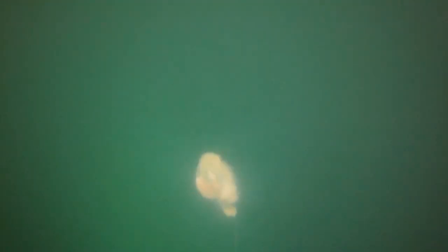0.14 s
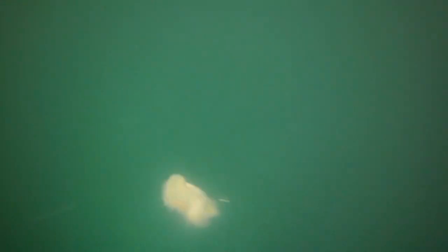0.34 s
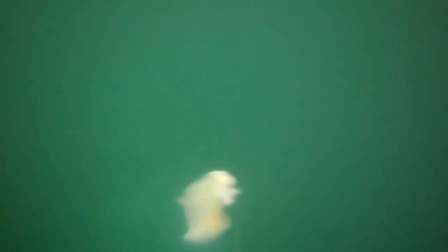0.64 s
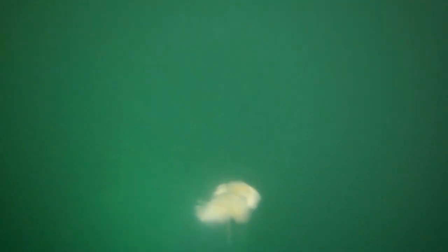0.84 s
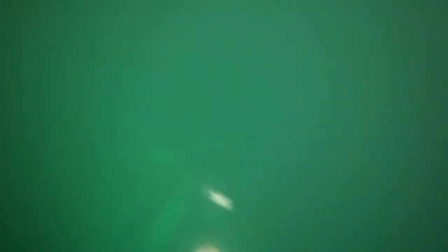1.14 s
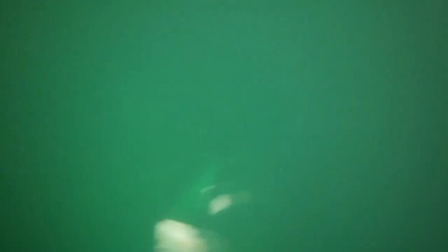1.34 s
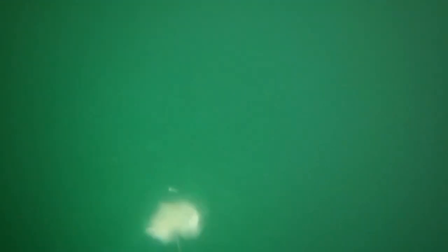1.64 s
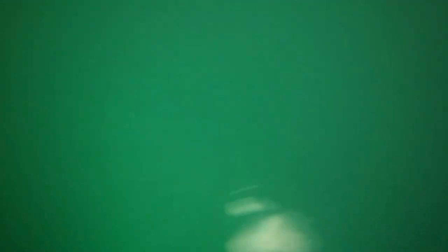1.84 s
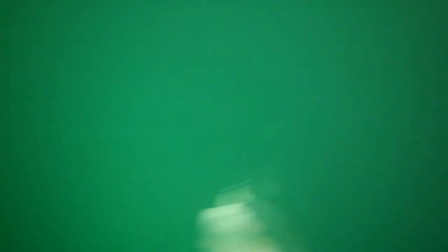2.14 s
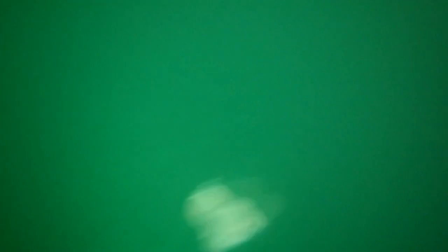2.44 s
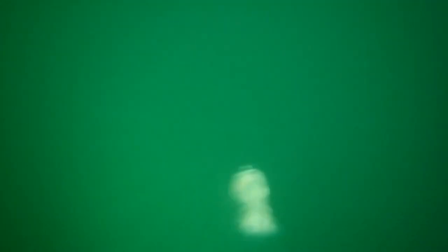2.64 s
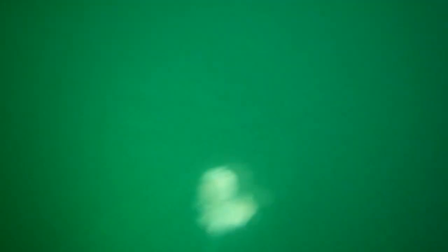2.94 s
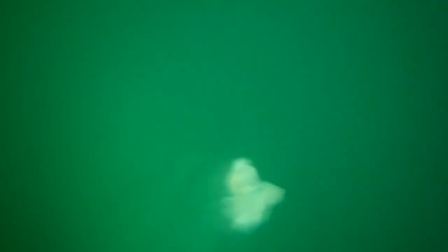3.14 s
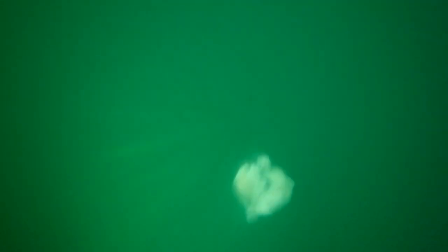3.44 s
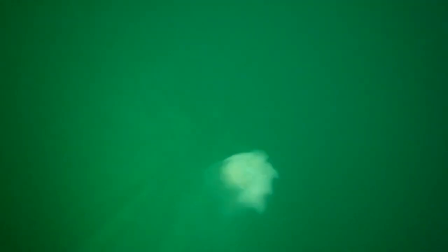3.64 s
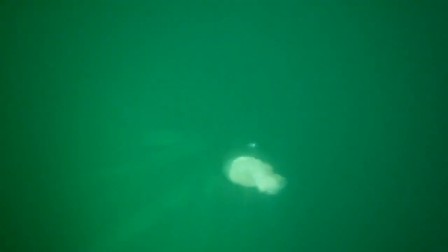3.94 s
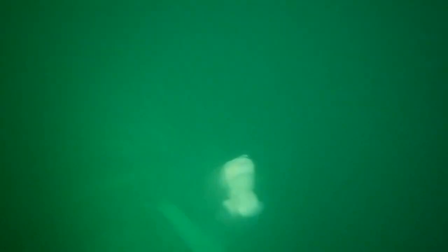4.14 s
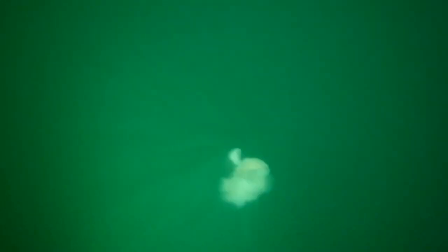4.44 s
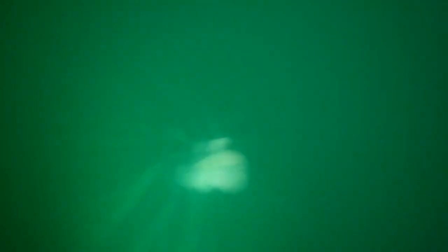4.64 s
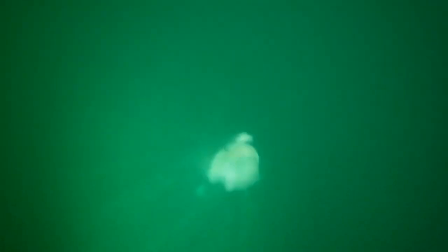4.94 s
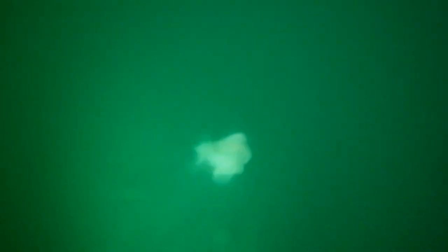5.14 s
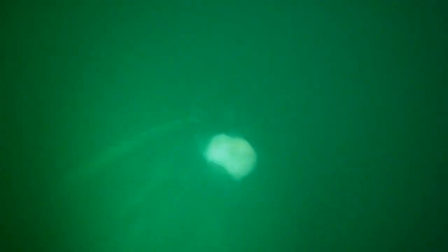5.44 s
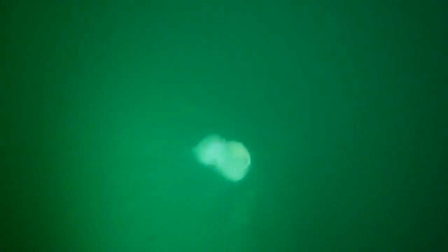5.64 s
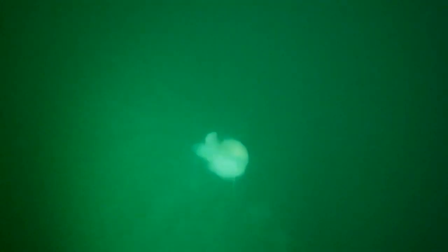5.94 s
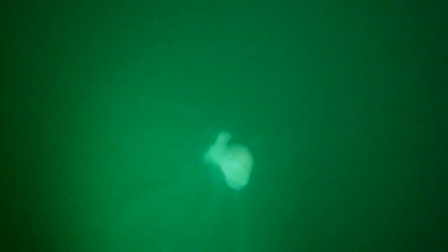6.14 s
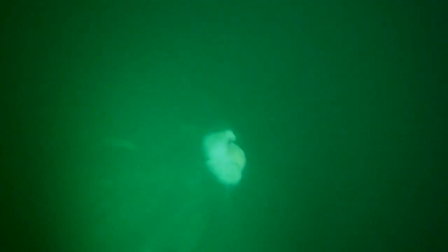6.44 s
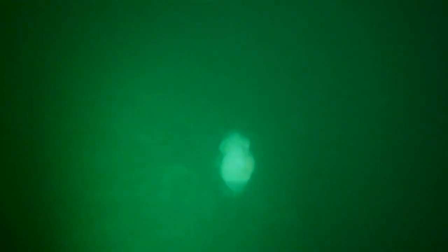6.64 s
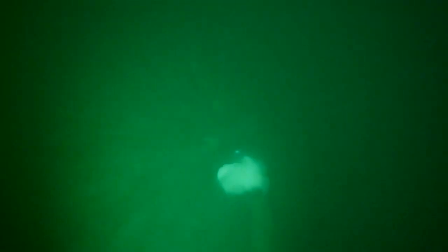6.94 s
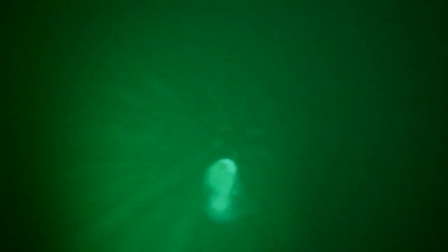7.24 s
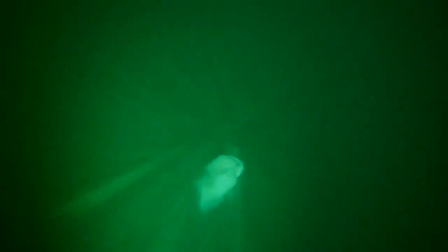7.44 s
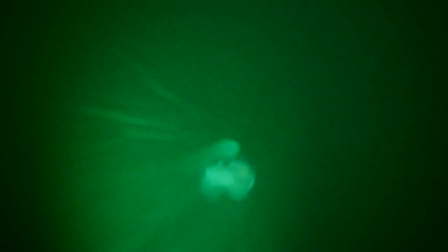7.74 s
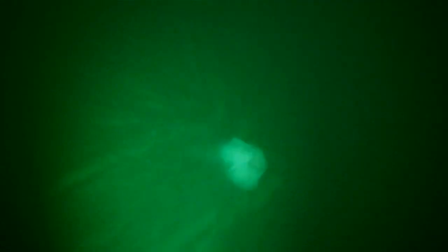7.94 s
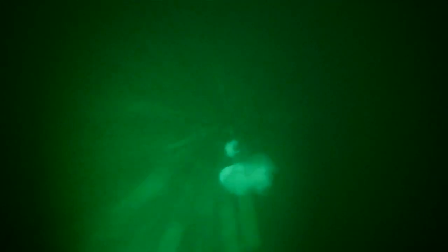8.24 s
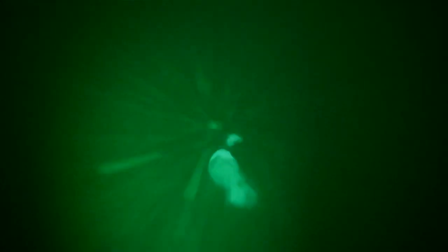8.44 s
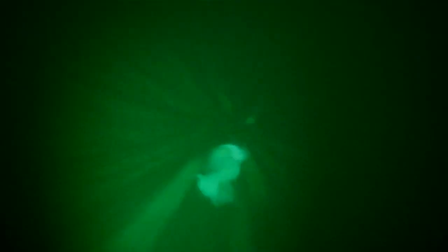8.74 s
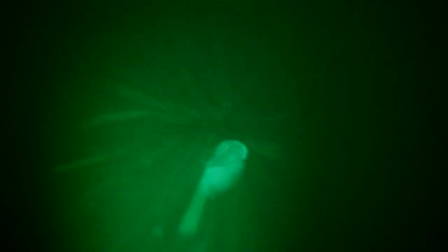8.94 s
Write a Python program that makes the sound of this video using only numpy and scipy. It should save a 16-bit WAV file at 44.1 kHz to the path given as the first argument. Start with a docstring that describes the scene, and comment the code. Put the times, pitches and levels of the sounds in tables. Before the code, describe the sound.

A hissing underwater rush surges against a plastic case, broken by clicks, knocks and brief gliding squeaks, slowly growing softer.

```python
"""Water and line rub the sealed plastic housing of a sinking camera, heard by its own microphone.
This friction forces the shell's resonances, and stick-slip motion breaks it into gliding squeals.
Jolts excite the same resonances by impact; the rush swells when the line tugs and at times dips briefly.
Underneath, the enclosed air hums, the water makes a low wash and the electronics hiss."""
import sys
import numpy as np
from scipy import signal
from scipy.fft import rfft, irfft, next_fast_len
from scipy.io import wavfile
from scipy.ndimage import uniform_filter1d

SR = 44100
rng = np.random.default_rng(int(sys.argv[2]) if len(sys.argv) > 2 else 0)


def transcribe(u):
    """Save the signal u as a 16-bit wav file named by the first command-line argument.

    u: samples, shape (n,) or (channels, n), limited to [-1, 1]; the rate is SR.
    q: integer samples, one column per channel.
    """
    v = np.clip(np.atleast_2d(u).T, -1, 1)
    q = np.round(v * 32767).astype(np.int16)
    wavfile.write(sys.argv[1], SR, q)


N = 400428


def undb(db):
    return 10 ** (np.asarray(db) / 20)


def level(x, db):
    return x * undb(db) / np.sqrt(np.mean(x ** 2))


def curve(table):
    """Linear interpolation: each column of a table against the time in its first."""
    time_s, *columns = np.transpose(table)
    return [np.interp(np.arange(N) / SR, time_s, c) for c in columns]


def walk(rate_hz):
    """Random modulation: held values, smoothed twice, with a spread near 1."""
    hold = max(int(SR / rate_hz), 2)
    steps = np.repeat(rng.standard_normal(N // hold + 1), hold)
    return 1.29 * uniform_filter1d(uniform_filter1d(steps, hold), hold)[:N]


def ring(drive, modes):
    """Modal superposition: steep resonances of alternating sign; white noise keeps its rms."""
    size = next_fast_len(N + SR // 4)
    f = np.arange(size // 2 + 1) * SR / size
    response = sum((-1) ** k * undb(db) * (1j * f * width / (hz ** 2 - f ** 2 + 1j * f * width)) ** 2
                   for k, (hz, width, db) in enumerate(modes))
    return irfft(rfft(drive, size) * response, size)[:N] / np.sqrt(np.mean(np.abs(response) ** 2))


def coloured(spectrum, rms_db):
    """Spectral shaping: white noise weighted by a curve over log frequency."""
    size = next_fast_len(N)
    f = np.maximum(np.arange(size // 2 + 1) * SR / size, 1)
    hz, density_db = np.transpose(spectrum)
    gain = undb(np.interp(np.log(f), np.log(hz), density_db))
    return level(irfft(rfft(rng.standard_normal(size)) * gain, size)[:N], rms_db)


# Rush along the housing: time_s, lower_level_db, upper_over_lower_db
RUSH = [(0, -24.5, 2), (.2, -28.5, 0.5), (.5, -27, -0.5), (1.3, -27, 1.5), (1.8, -28.5, -2.5),
        (2.3, -31, -4), (2.7, -30, -2.5), (3.3, -28.5, -1.5), (3.9, -27.5, -3), (4.1, -31.5, -7),
        (4.5, -31, -5), (5.1, -31, 0.5), (5.9, -31.5, -6), (6.6, -35, -4.5), (7.4, -35, -5.5),
        (8, -38.5, -6.5), (8.5, -37.5, -6), (9.08, -36, -6.5)]
# Tugs on the line: crest_s, half_span_s, lower_rise_db, upper_rise_db
SURGES = [(0.007, 0.046, 6, 0), (0.336, 0.09, 3, 1.5), (1.163, 0.04, 1.5, 4), (1.394, .06, 4.5, -1),
          (1.482, 0.074, 1, 6.5), (1.587, 0.061, 2, 3.5), (1.641, .04, 2, -1), (1.767, 0.046, 0.5, 5.5),
          (1.851, .06, -1, 5), (1.947, 0.043, 1, -10), (2.005, 0.069, 1, 4), (2.234, 0.06, 7, 0.5),
          (2.16, 0.032, 1, 2), (2.342, 0.065, -2, 6), (2.508, .1, 5, -0.5), (2.553, 0.052, 2, 0),
          (3.761, 0.049, 1, 6.5), (3.924, 0.059, 0.5, 3.5), (4.021, .05, 6, 14), (4.172, 0.087, 1.5, 9.5),
          (4.299, 0.053, 0, 7), (4.436, .06, 4, 8), (6.805, 0.056, -1, 2.5), (6.93, 0.051, 3, 1),
          (7.031, 0.065, 1, 2), (7.148, 0.081, 0, 1.5), (7.68, 0.11, 4, 4), (7.784, 0.043, 8, 9),
          (8.083, 0.032, 9.5, 5), (8.226, .12, 5.5, 1.5), (8.387, 0.028, 9, 0), (8.541, .14, 7.5, 3),
          (9.041, 0.083, 0, 0.5)]


def rush():
    """Friction noise swells with each tug: its envelopes in dB for the lower and upper shell modes."""
    t = np.arange(N) / SR
    lower_db, upper_over_lower_db = curve(RUSH)
    upper_db = lower_db + upper_over_lower_db
    for crest_s, half_span_s, lower_rise_db, upper_rise_db in SURGES:
        near = slice(max(int((crest_s - half_span_s) * SR), 0), int((crest_s + half_span_s) * SR))
        hump = np.cos(np.pi / 2 * (t[near] - crest_s) / half_span_s) ** 4
        lower_db[near] += lower_rise_db * hump
        upper_db[near] += upper_rise_db * hump
    return lower_db, upper_db


def bubbles(low_hz, high_hz, length_s, count):
    """Small bubbles and slips oscillate briefly: gliding tones superposed at random, at rms 1."""
    when, pitch, glide, size = rng.random((count, 4)).T[:, :, None]
    progress = np.arange(int(length_s * SR)) / (length_s * SR)
    hz = low_hz * (high_hz / low_hz) ** pitch * (1 + 0.33 * (glide - .5) * progress)
    envelope = undb(-3.5 * np.log(size + 0.061)) * np.sin(np.pi * progress) ** 2
    grains = envelope * np.sin(2 * np.pi * np.cumsum(hz, axis=1) / SR)
    place = (when * N).astype(int) + np.arange(len(progress))
    return level(np.bincount(place.ravel(), grains.ravel(), minlength=N)[:N], 0)


def grit(count=420, rise_db=9, length_s=0.006):
    """Grit on the shell modulates the friction: brief random rises of its level, in dB."""
    when, size = rng.random((count, 2)).T
    contacts = np.bincount((when * N).astype(int), size ** 2, minlength=N)
    return rise_db * signal.oaconvolve(contacts, np.hanning(int(length_s * SR)), "same")


# Lower shell modes: pitch_hz, width_hz, shallow_gain_db, deep_gain_db
LOWER_MODES = [(276, 150, -15, -61), (481.7, 129, -15, -2), (711, 340, -8, -14), (979, 250, -4, 2.5),
               (1152.5, 157, 3.5, -4), (1368, 305, -2, -4.5)]
# Upper shell modes: pitch_hz, width_hz, gain_db
UPPER_MODES = [(2320, 800, -18.5), (2761, 343, -0.5), (2898, 190, 3), (3280, 390, 7.5), (3950, 585, -4),
               (5540, 620, -23.5)]
# Thud and ring of a jolt: pitch_hz, width_hz, gain_db
KNOCK_MODES = [(186, 250, -8), (444, 340, -8.5), (1068, 124, 9)]


def housing():
    """Forced vibration: rubbing, jolts and squeal overtones drive the shell; the fundamental adds on."""
    lower_db, upper_db = rush()
    eddies_db = 1.1 * walk(18) + 1.1 * walk(55)  # felt by the whole shell
    lower_blows, upper_blows = jolts()
    fundamental, overtones = squeals()
    grit_db = grit()
    friction = rng.standard_normal(N)
    # While the line squeals, its plain rubbing gives way.
    squeal_envelope = uniform_filter1d(np.abs(fundamental), int(0.012 * SR))
    rub_gain = dips() / (1 + squeal_envelope / undb(-18.5))

    lower_rub = friction + undb(-14) * bubbles(low_hz=600, high_hz=1502.5, length_s=.022, count=1500)
    lower_gain = rub_gain * undb(lower_db - 4 + eddies_db + 0.57 * walk(30) + .7 * grit_db)
    lower_drive = lower_gain * lower_rub + lower_blows
    upper_rub = friction + undb(-13) * bubbles(low_hz=1800, high_hz=4507.5, length_s=.011, count=1800)
    upper_gain = rub_gain * undb(upper_db - 3.5 + eddies_db + 1.13 * walk(40) + grit_db)
    upper_drive = upper_gain * upper_rub + upper_blows

    depth = np.linspace(0, 1, N)  # growing pressure shifts the balance of the lower modes
    pitch_hz, width_hz, shallow_db, deep_db = np.transpose(LOWER_MODES)
    shallow = ring(lower_drive, np.c_[pitch_hz, width_hz, shallow_db])
    deep = ring(lower_drive, np.c_[pitch_hz, width_hz, deep_db])
    upper = ring(upper_drive + undb(-4 - 14.3 * depth) * overtones, UPPER_MODES)
    thud = undb(-6.5) * ring(lower_blows, KNOCK_MODES)
    return (1 - depth) * shallow + depth * deep + upper + fundamental + thud


# Hum of the enclosed air: time_s, level_db
CAVITY_HUM = [(0, -48), (.15, -44.5), (1.85, -54), (1.93, -40), (2.9, -37.5), (3.4, -44), (3.9, -39.5),
              (4.02, -43), (4.08, -58), (4.2, -42), (4.4, -44), (5.4, -46.5), (5.9, -40), (7.5, -46),
              (7.65, -45), (7.95, -49), (8.1, -40), (9.08, -42.5)]


def cavity(pitch_hz=575, sag_hz=30, width_hz=80):
    """Cavity resonance: the shaken air hums in one narrow band that wavers and sags with depth."""
    level_db, = curve(CAVITY_HUM)
    hz = (pitch_hz - np.linspace(0, sag_hz, N)) * (1 + .02 * walk(12))
    phase = 2 * np.pi * np.cumsum(hz) / SR
    hum = walk(width_hz) * np.sin(phase) + walk(width_hz) * np.cos(phase)
    return undb(level_db + 3.37 * walk(20)) * level(hum, -0.89)


# Spectrum of the wash: frequency_hz, relative_density_db
WASH_SPECTRUM = [(15, -67), (25, -34), (162, -12), (400, -4), (520, -19), (880, -120)]
# Swell of the wash: time_s, gain_db
WASH_SWELL = [(0, 8), (.5, 0.5), (1.3, -1.5), (1.4, 10), (1.5, 0), (2.5, -0.5), (3.4, 0.5), (4, -1),
              (4.7, -0.5), (5.3, 0), (6.2, 1), (7.4, -0.5), (7.7, 0), (8, 2), (9.08, -2.5)]


def wash():
    """Flow noise: a low band from the water, slowly modulated in amplitude."""
    swell_db = curve(WASH_SWELL)[0] + 3.1 * walk(9)
    return undb(swell_db) * coloured(WASH_SPECTRUM, rms_db=-52.5)


# Spectrum of the hiss: frequency_hz, relative_density_db
HISS_SPECTRUM = [(300, 2), (2000, 7), (5000, -2), (7000, -2), (10000, -1.5), (13000, -1.5), (16000, 1)]


def hiss():
    """Electronic self-noise: a broadband floor that flickers slightly."""
    flicker_db = 0.61 * walk(12) + .5 * walk(35)
    return undb(flicker_db) * coloured(HISS_SPECTRUM, rms_db=-42.5)


# Blows on the housing: time_s, relative_level_db, upper_gain_db, decay_s
JOLTS = [(0.068, -10.5, -4, 0.011), (0.644, -15, -10, 0.0091), (1.128, -22, 10, 0.0074),
         (1.212, -18.5, -14, 0.013), (1.694, -20, 0, 0.009), (1.848, -21, -7, 0.0064),
         (1.944, -11.5, -10, 0.0089), (2.092, -22, -12, 0.005), (2.144, -11, -9, 0.012),
         (2.177, -12.5, -3, 0.0061), (2.208, -14, -18, 0.0098), (2.279, -12, -4, 0.0062),
         (2.429, -18.5, 2, 0.0057), (2.545, -22, 9, 0.0095), (2.591, -19.5, 6, 0.0082),
         (3.149, -26.5, 13.5, 0.0077), (3.343, -13, -8, 0.0078), (3.588, -12.5, -6, 0.0075),
         (3.95, -7, -9, 0.0082), (4.001, -7, -16, 0.011), (4.193, -18, -2, 0.0096),
         (4.274, -10, -12, 0.0078), (4.304, -8.5, -15, 0.0032), (4.435, -16, -0.5, 0.0076),
         (4.522, -18, -1, 0.011), (4.562, -11, -8.5, 0.0069), (5.154, -14, -8, 0.0086),
         (5.361, -21, -17, 0.0092), (6.532, -18, -4, 0.011), (6.757, -17, -1.5, 0.011),
         (6.978, -15, -4.5, 0.0093), (7.273, -17, -6, 0.0092), (7.495, -16, -10, 0.011),
         (7.602, -8.5, -17, 0.0083), (7.648, -8.5, -13.5, 0.0095), (7.68, -17.5, -7, 0.011),
         (7.784, -15.5, -3, 0.015), (7.817, -15, -14, 0.007), (8.093, -18, 1, 0.0073),
         (8.238, -21, -3, 0.011), (8.528, -16, -5, 0.0074), (9.007, -16.5, -9, 0.0066)]


def jolts(scrape_db=-13.5, upper_coupling_db=2, rise_over_decay=0.54, tap_delay_s=.004):
    """Impact excitation of the lower and upper modes: a scrape swells to a sharp tap, then dies."""
    lower, upper = np.zeros(N), np.zeros(N)
    lead = SR // 50
    for time_s, level_db, upper_gain_db, decay_s in JOLTS:
        start = int((time_s + tap_delay_s) * SR) - lead
        age = np.arange(-lead, 4 * lead) / SR / decay_s
        envelope = np.exp(-np.where(age < 0, age / rise_over_decay, age) ** 2)
        blow = envelope * rng.standard_normal(len(age))
        blow[lead] = undb(12)  # the tap
        blow = undb(level_db + scrape_db) * blow[:N - start]
        lower[start:start + len(blow)] += blow
        upper[start:start + len(blow)] += undb(upper_gain_db + upper_coupling_db) * blow
    return lower, upper


# Clear squeals: start_s, length_s, start_pitch_hz, middle_pitch_hz, end_pitch_hz, level_db
SQUEALS = [(0.088, 0.047, 696, 500, 540, -40), (0.249, 0.046, 596, 540, 550, -35),
           (0.389, .1, 529, 590, 770, -36), (0.767, 0.03, 688, 700, 700, -32),
           (0.919, .08, 743.5, 770, 830, -32), (1.021, .12, 780, 830, 810, -31),
           (1.135, .03, 1550, 1370, 1150, -36), (1.16, .05, 1002, 910, 720, -26),
           (1.222, .15, 746, 820, 890, -30.5), (1.377, .035, 1078, 940, 1050, -36),
           (1.411, .1, 787, 890, 910, -28), (1.56, .045, 761, 900, 1030, -24.5),
           (1.615, .055, 876, 830, 790, -26.5), (1.686, .055, 785, 947, 820, -25),
           (2.198, .06, 1105, 1160, 1370, -31), (2.709, .045, 902, 810, 910, -29.5),
           (3.243, .07, 803, 830, 700, -31), (3.616, .05, 769, 930, 750, -25.5),
           (3.688, .09, 698, 750, 840, -33.5), (4.001, .066, 600, 1190, 680, -23),
           (4.129, .085, 757, 910, 640, -28), (4.495, .05, 799, 870, 830, -34),
           (4.621, .045, 462, 440, 480, -35), (4.932, .09, 758, 800, 700, -34),
           (5.043, .09, 728, 830, 650, -31.5), (5.148, .03, 954, 900, 870, -24),
           (5.182, .04, 880, 860, 760, -31), (5.251, .09, 680, 780, 840, -36.5),
           (5.38, .08, 945, 820, 830, -36.5), (5.7, .045, 680, 690, 620, -36.5),
           (6.79, .035, 950, 880, 860, -32), (6.9, .055, 899, 1000, 750, -32.5),
           (7.014, .055, 950, 1010, 820, -30.5), (7.115, .05, 899, 1000, 760, -34),
           (8.88, .08, 698, 750, 780, -41), (9.03, .035, 850, 910, 850, -33)]
# Faint squealing between the clear ones: time_s, level_over_rush_db
WARBLE = [(0, -20), (.85, -20), (.95, -10), (1.8, -10), (2, -18), (3.1, -18), (3.3, -12), (4.2, -12),
          (4.4, -20), (4.9, -18), (5, -11), (5.45, -11), (5.55, -24), (6.7, -24), (6.8, -14), (7.2, -14),
          (7.3, -22), (9.08, -22)]
# Harmonics of a squeal: harmonic_number, gain_db
OVERTONES = [(3, -6), (4, -16), (6, -30)]


def squeals(warble_hz=800, attack_s=0.011, release_s=0.013, roughness=.55):
    """Stick-slip oscillation of the line: a gliding, wavering fundamental and its overtones."""
    t = np.arange(N) / SR
    hz = warble_hz * (1 + .11 * walk(30))
    gain = undb(curve(RUSH)[0] + curve(WARBLE)[0] + 2.5 * walk(40)) * dips()
    for start_s, length_s, *glide_hz, level_db in SQUEALS:
        on = slice(int(start_s * SR), int((start_s + length_s) * SR))
        age_s = t[on] - start_s
        hz[on] = np.interp(age_s / length_s, [0, .5, 1], glide_hz)
        envelope = np.clip(np.minimum(age_s / attack_s, (length_s - age_s) / release_s), 0, 1)
        gain[on] += envelope * (undb(level_db) - gain[on])
    hz = uniform_filter1d(hz, int(0.0073 * SR))
    gain = uniform_filter1d(gain, int(0.0045 * SR)) * undb(1.5 * walk(55) + 2.6 * walk(160))
    phase = 2 * np.pi * np.cumsum(hz * (1 + .035 * walk(110))) / SR
    # Uneven slips smear each partial into a rough band.
    overtones = sum(undb(db) * walk(900) * np.sin(k * phase) for k, db in OVERTONES)
    overtones *= np.sqrt(np.abs(gain) / undb(-29.5))  # strongest in loud squeals
    fundamental = np.sin(phase) + roughness * (walk(260) * np.sin(phase) + walk(260) * np.cos(phase))
    return gain * fundamental, gain * overtones


# Brief dips in the rubbing and faint squealing: start_s, end_s, gain_db
DIPS = [(1.505, 1.534, -3.5), (1.598, 1.613, -5), (3.96, 3.995, -10), (4.221, 4.28, -17),
        (4.358, 4.389, -11), (5.747, 5.759, -14), (7.613, 7.642, -30), (7.74, 7.772, -18)]


def dips():
    """Amplitude modulation: a gain of 1 that dips briefly, lowering the rubbing and faint squealing."""
    t, gain_db = np.arange(N) / SR, np.zeros(N)
    for start_s, end_s, dip_db in DIPS:
        gain_db[(t > start_s) & (t < end_s)] = dip_db
    return undb(uniform_filter1d(gain_db, int(0.0024 * SR)))


def scene():
    """Superposition: all sources add in one microphone signal, which feeds both channels."""
    mono = housing() + cavity() + wash() + hiss()
    return np.array([mono, mono])


def record(dry, bass_cut_hz=120, top_cut_hz=15800, drive=1.6):
    """Band limiting and soft saturation: the recorder cuts the bass, rounds peaks and cuts the top."""
    high_pass = signal.butter(2, bass_cut_hz, "high", fs=SR, output="sos")
    low_pass = signal.ellip(12, .2, 80, top_cut_hz, fs=SR, output="sos")
    rounded = np.tanh(drive * signal.sosfilt(high_pass, dry)) / drive
    return signal.sosfilt(low_pass, rounded)


dry = scene()
out = record(dry)
transcribe(out)
```